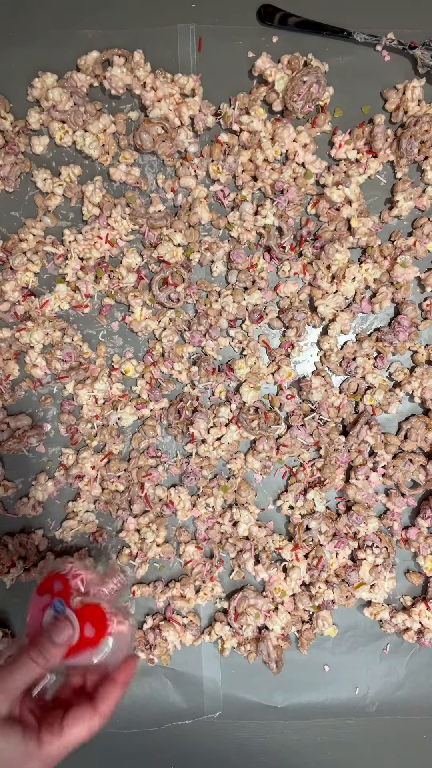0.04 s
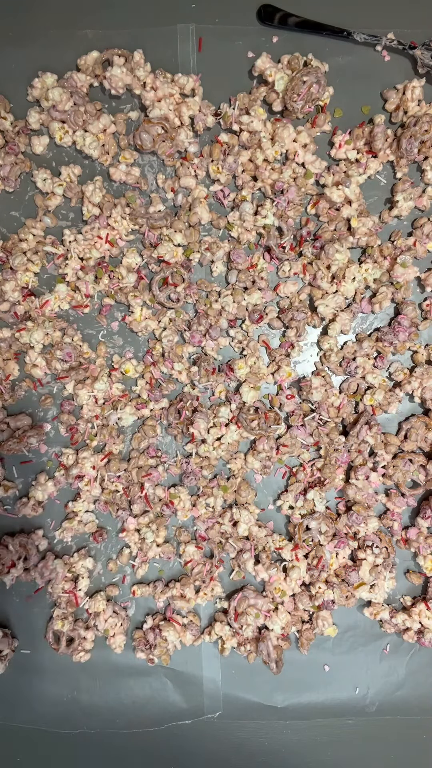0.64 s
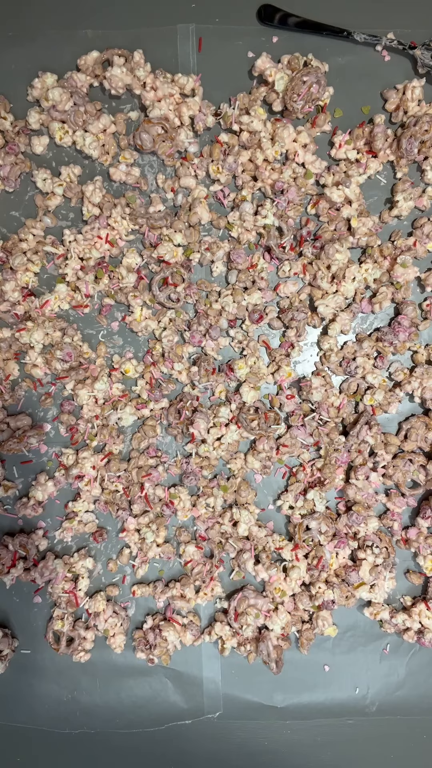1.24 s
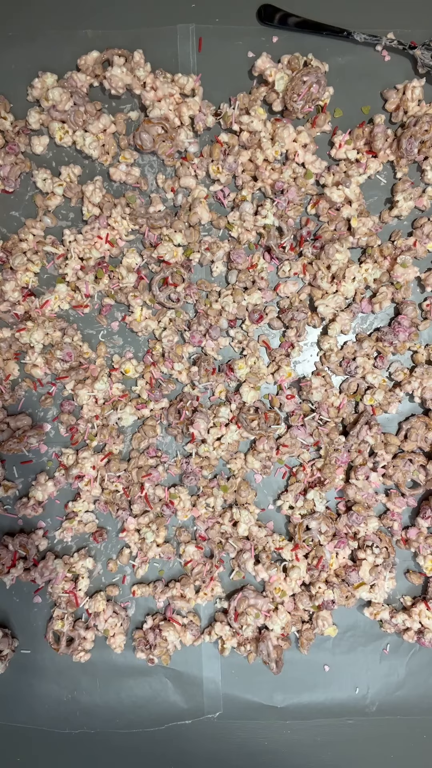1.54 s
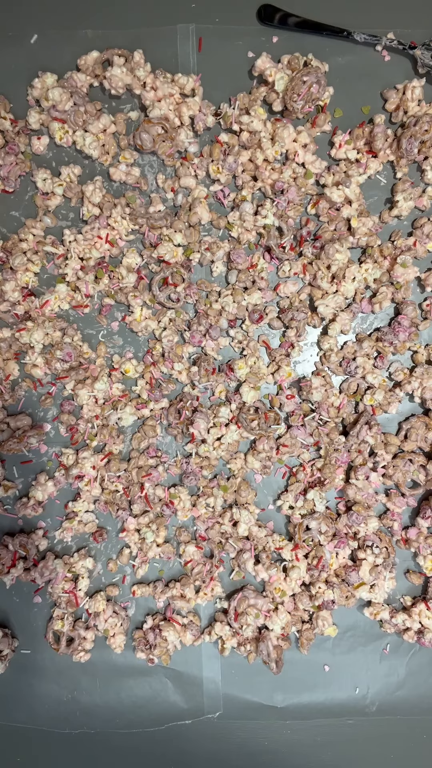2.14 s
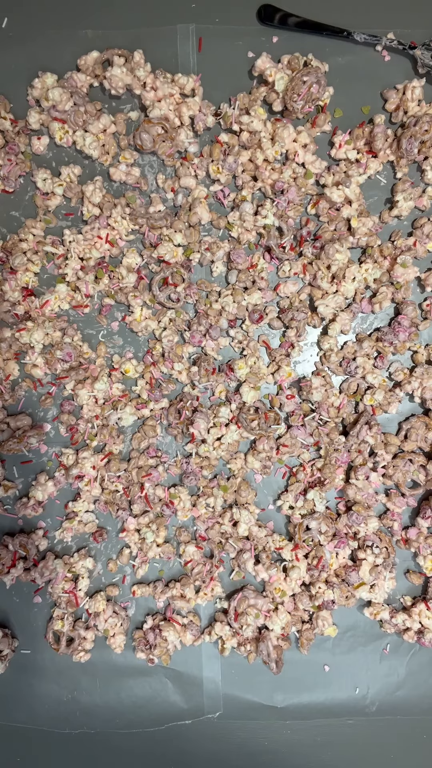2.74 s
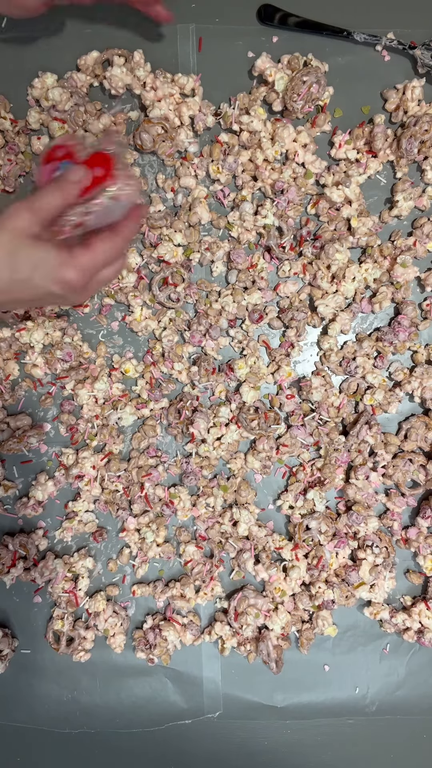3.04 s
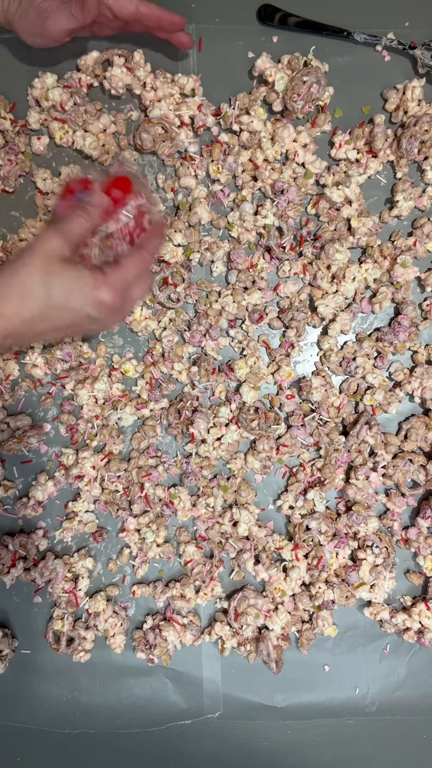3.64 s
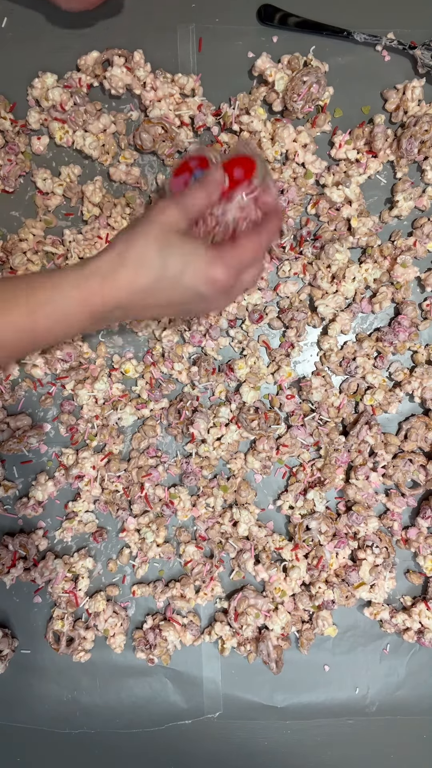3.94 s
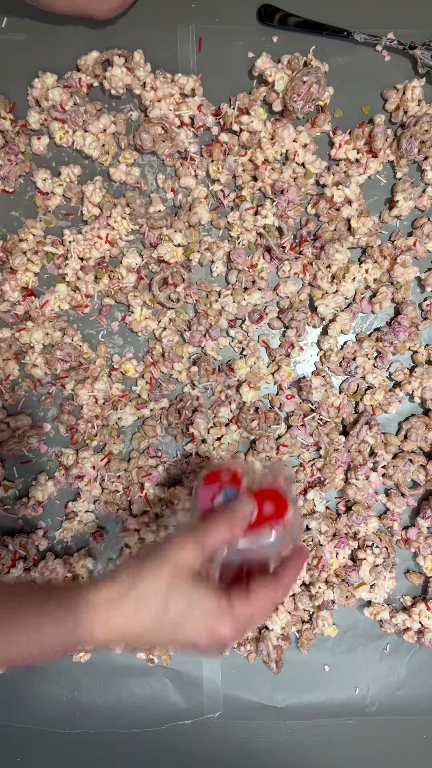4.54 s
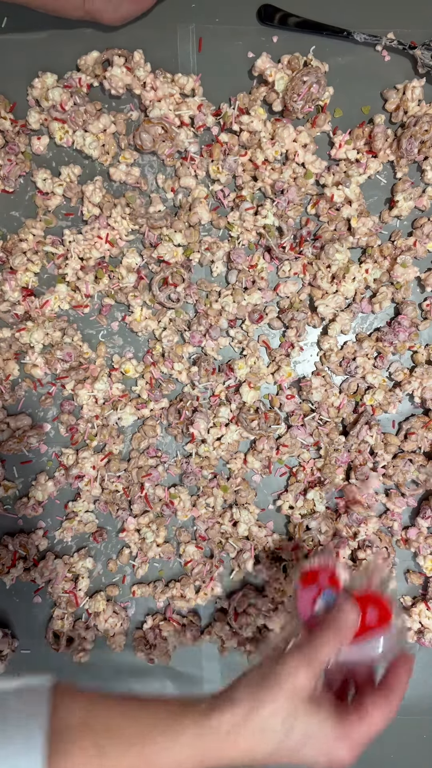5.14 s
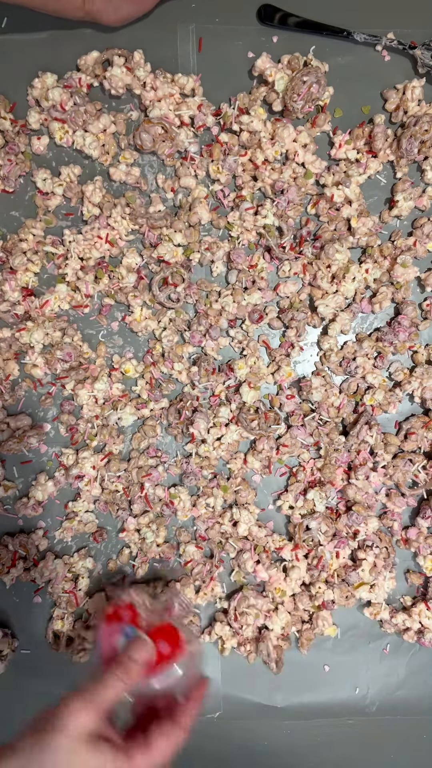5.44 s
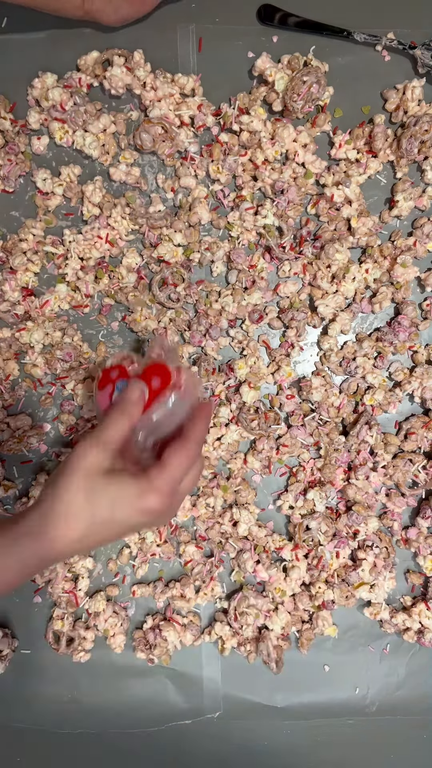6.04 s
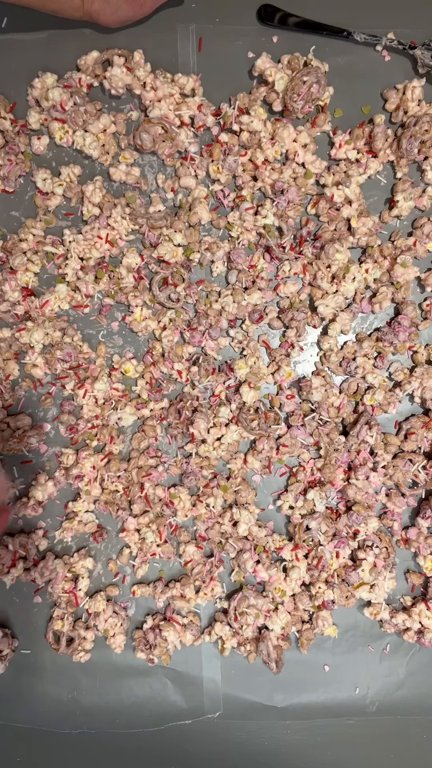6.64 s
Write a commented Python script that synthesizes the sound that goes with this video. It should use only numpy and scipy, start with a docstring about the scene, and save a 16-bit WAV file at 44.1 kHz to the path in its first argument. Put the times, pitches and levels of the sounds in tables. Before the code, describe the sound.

A small plastic tub of sprinkles is shaken fast and evenly, making a crisp, grainy rattle with a slightly hollow ring.

```python
"""A small plastic shaker of sugar sprinkles, shaken about six times a second over a kitchen tray.
On each stroke the grains slide, pile against the end and ring the hollow tub; on the way back they
rattle more softly. Single grains tick, clumps knock and the hand bumps the tub now and then.
Behind it: room air, a faint hum and a low distant drone that fades."""
import sys
import numpy as np
from scipy import signal
from scipy.fft import rfft, irfft, next_fast_len
from scipy.io import wavfile
from scipy.ndimage import map_coordinates

SR = 44100
rng = np.random.default_rng(int(sys.argv[2]) if len(sys.argv) > 2 else 0)


def transcribe(signal):
    """Save signal, clipped to [-1, 1], as a 16-bit WAV file at the path in sys.argv[1]."""
    frames = np.atleast_2d(signal).T
    limited = np.clip(frames, -1, 1)
    pcm = np.round(limited * 32767).astype(np.int16)
    wavfile.write(sys.argv[1], SR, pcm)


N = 303363

# hand strokes: t/s, rattle/dB, length/s, draw-back lead/s, draw-back/dB, cavity/dB, cavity/Hz, plate/Hz
STROKES = [(0.002, -26, 0.016, 0.052, -28, -43, 2050, 4200),
           (0.117, -30.5, 0.08, 0.05, -36, -45.0, 2020, 4040),
           (0.278, -29.5, 0.049, 0.048, -40, -48, 2000, 4120),
           (0.432, -31, 0.071, 0.048, -39.5, -44, 2030, 3870),
           (0.609, -32, 0.058, 0.051, -34, -42.5, 1890, 3770),
           (0.783, -31.5, 0.05, 0.056, -35, -45, 2010, 3930),
           (0.947, -30.5, 0.05, 0.059, -38, -42, 2100, 3920),
           (1.108, -32.0, 0.067, 0.066, -36.5, -42.5, 2050, 3800),
           (1.277, -32.5, 0.065, 0.058, -33.0, -44.5, 1980, 3860),
           (1.438, -34.5, 0.048, 0.062, -41, -44.5, 2010, 3890),
           (1.583, -32.5, 0.035, 0.055, -42.5, -43.5, 2010, 3800),
           (1.743, -35.5, 0.048, 0.046, -37.5, -49, 2060, 3820),
           (1.903, -34.5, 0.044, 0.06, -35.5, -48, 1980, 3820),
           (2.056, -34, 0.038, 0.048, -37, -48.5, 2010, 3800),
           (2.197, -34, 0.041, 0.05, -42.5, -48, 2050, 3800),
           (2.352, -31.5, 0.038, 0.065, -40.5, -42.5, 2020, 4050),
           (2.511, -33, 0.052, 0.057, -38.5, -42.5, 2020, 3800),
           (2.653, -34.5, 0.083, 0.028, -37.5, -42.5, 1990, 3700),
           (2.828, -34.5, 0.043, 0.047, -42, -45.5, 2070, 3670),
           (2.986, -32.5, 0.042, 0.059, -39.5, -45, 2070, 3940),
           (3.143, -36, 0.051, 0.057, -33, -48, 2010, 4040),
           (3.295, -35, 0.045, 0.052, -37, -48.5, 1950, 4200),
           (3.454, -34.5, 0.066, 0.066, -36.5, -44, 2025, 3900),
           (3.624, -31.5, 0.07, 0.053, -38.5, -45.0, 1960, 3840),
           (3.799, -30.5, 0.048, 0.052, -31.5, -46, 2120, 3890),
           (3.961, -33.5, 0.09, 0.057, -36.5, -43.5, 2030, 3880),
           (4.125, -31.5, 0.032, 0.048, -38, -40.5, 2055, 4000),
           (4.287, -32, 0.049, 0.057, -35, -42.5, 1940, 4080),
           (4.451, -33.5, 0.056, 0.062, -38.5, -40.5, 2060, 4000),
           (4.611, -27.5, 0.034, 0.064, -37.5, -39.5, 2020, 4070),
           (4.772, -30, 0.039, 0.043, -35.5, -41.5, 2040, 3880),
           (4.925, -31.5, 0.031, 0.043, -38.0, -42.5, 2000, 4100),
           (5.082, -37.5, 0.023, 0.04, -44, -48.5, 2000, 4070),
           (5.232, -34, 0.031, 0.059, -42.5, -45, 2100, 4030),
           (5.37, -33.5, 0.041, 0.051, -41, -46, 2010, 3820),
           (5.52, -31.0, 0.051, 0.04, -41.5, -44, 2040, 3890),
           (5.686, -28.5, 0.029, 0.066, -39.5, -39.5, 1955, 4080),
           (5.847, -33, 0.039, 0.057, -37.5, -46, 2030, 3880),
           (5.99, -33.5, 0.045, 0.058, -43.5, -49.5, 2190, 3970),
           (6.145, -35, 0.043, 0.046, -38.5, -44.5, 2070, 4000),
           (6.309, -32.0, 0.046, 0.06, -38, -42.5, 2040, 3790),
           (6.463, -29.5, 0.031, 0.051, -38.5, -44.5, 2050, 3920),
           (6.629, -36.5, 0.06, 0.078, -39.5, -45, 2010, 3960),
           (6.766, -38.5, 0.033, 0.028, -38, -52.5, 2080, 3920)]
# loose grains rolling: t/s, level/dB
ROLLING = [(0, -49.5), (1.6, -47), (3.3, -48.5), (4.6, -47), (5.1, -47), (6.5, -45), (6.79, -49),
           (6.82, -56), (6.88, -57)]
# end plate ring and landing thud as the tub empties: t/s, plate gain/dB, thud gain/dB
FILL = [(0, -12, -10), (0.7, -8, -12.5), (1.3, -23, -11), (1.9, -5.5, -10), (2.5, -15, -12),
        (3.3, -9, -7.5), (4.5, -9.5, -12.5), (5.6, -5, -15), (6.3, -6.5, -10.5), (6.7, -4, -12.5)]


def amp(db):
    """Decibels to gain."""
    return 10 ** (np.asarray(db) / 20)


def unit(x):
    """Scale to rms 1."""
    return x / np.sqrt(np.mean(x ** 2) + 1e-20)


def along(points, hz):
    """Interpolate (f/Hz, value) points on a log axis."""
    f, value = np.transpose(points)
    return np.interp(np.log(hz + 1), np.log(f + 1), value)


def clock():
    """Sample times in s."""
    return np.arange(N) / SR


def curves(rows):
    """One per-sample curve for each column after t/s."""
    t, *columns = np.transpose(rows)
    return [np.interp(clock(), t, column) for column in columns]


def wobble(rate_hz):
    """Smooth random curve, rate_hz knots a second."""
    t = clock()[::32]
    return np.interp(clock(), t, map_coordinates(rng.standard_normal(4096), [t * rate_hz], mode="wrap"))


def filtered(x, response):
    """Apply a complex frequency response."""
    size = 2 * next_fast_len((N + SR // 2) // 2)
    return irfft(rfft(x, size) * response(np.fft.rfftfreq(size, 1 / SR)), size)[..., :N]


def highpass(x, edge_hz, order=3):
    """Low cut: a small body radiates little bass."""
    return signal.sosfilt(signal.butter(order, edge_hz, "highpass", fs=SR, output="sos"), x)


def causal(gain):
    """Minimum-phase response with this gain: rings only after a hit."""
    cepstrum = irfft(np.log(np.maximum(gain, 1e-6)))
    half = len(cepstrum) // 2
    cepstrum[1:half] *= 2
    cepstrum[half + 1:] = 0
    return np.exp(rfft(cepstrum))


def resonance(hz, centre_hz, width_hz):
    """Response of one damped mode."""
    return 1j * hz * width_hz / (centre_hz ** 2 - hz ** 2 + 1j * hz * width_hz)


def modes(hz, rows):
    """Summed response of (f/Hz, width/Hz, level/dB) modes."""
    return sum(amp(db) * resonance(hz, centre_hz, width_hz) for centre_hz, width_hz, db in rows)


def noise(spectrum):
    """Coloured noise of rms 1."""
    return unit(filtered(rng.standard_normal(N), lambda hz: amp(along(spectrum, hz))))


def surges(rows, sharpness=1.56):
    """Summed power of grain surges (t/s, level/dB, rise/s, fall/s)."""
    t = clock()[::32]
    power = 0
    for peak_s, db, rise_s, fall_s in rows:
        distance = np.abs((t - peak_s) / np.where(t < peak_s, rise_s, fall_s))
        power += amp(db) ** 2 * np.exp(-distance ** sharpness)
    return np.interp(clock(), t, power) + 1e-12


def forward_power(db, lag_s=0, stretch=1, rise_share=.42):
    """One surge per forward stroke; the grains gather speed over rise_share of it."""
    t, _, length_s, *_ = np.transpose(STROKES)
    span_s = stretch * length_s
    return surges(zip(t + lag_s, db, span_s * rise_share, span_s * (1 - rise_share)))


def back_power(rise_s=.016, fall_s=.022):
    """The draw-back before each stroke throws the grains against the lid."""
    return surges((t - lead_s, db, rise_s, fall_s) for t, _, _, lead_s, db, *_ in STROKES)


def impacts(power, rate_hz, scatter_db):
    """Random collisions carrying this power: a stronger surge brings more and harder ones."""
    chance = np.clip(rate_hz / SR * unit(np.sqrt(power)), 1e-6, 1)
    luck, hardness, polarity = rng.random((3, N))
    hit = luck < chance
    size = amp(scatter_db * np.sqrt(12) * hardness[hit]) * np.sign(polarity[hit] - .5)
    out = np.zeros(N)
    out[hit] = unit(size) * np.sqrt(power[hit] / chance[hit])
    return out


def ringing(power, body, rate_hz, scatter_db, pitch_hz, hop_s=.025, detune=.007, load_db=2):
    """Grains strike a body; every hop_s the sliding load shifts its modes in pitch and level."""
    blows = impacts(power, rate_hz, scatter_db)
    out = np.zeros(N + SR)
    hop, size = round(hop_s * SR), 4096
    hz = np.fft.rfftfreq(size, 1 / SR)
    stroke_s = [row[0] for row in STROKES]
    pitch_ratios = np.clip(pitch_hz / np.median(pitch_hz), .94, 1.07)
    for start in range(0, N, hop):
        ratio = np.interp(start / SR, stroke_s, pitch_ratios)
        loaded = [(centre_hz * ratio * (1 + detune * rng.normal()), width_hz, db + load_db * rng.normal())
                  for centre_hz, width_hz, db in body]
        out[start:start + size] += irfft(rfft(blows[start:start + hop], size) * modes(hz, loaded))
    return np.sqrt(power.mean()) * unit(out[:N])


def hits(rows, spread_hz, t60_s):
    """Short blows (t/s, peak/dB, f/Hz), each ringing a fresh cluster of damped modes."""
    out, t = np.zeros(N + SR), np.arange(SR // 12) / SR
    for start_s, db, pitch_hz in rows:
        mode_hz = pitch_hz + spread_hz * rng.uniform(-1, 1, (24, 1))
        strength = rng.standard_normal((24, 1))
        ring = np.sum(strength * np.sin(2 * np.pi * mode_hz * t), axis=0)
        blow = ring * amp(-60 * t / t60_s)
        out[round(start_s * SR):][:len(t)] += amp(db) * blow / np.abs(blow).max()
    return out[:N]


def grain_clicks(power):
    """Grains click on each other and on the plastic, each at a pitch set by its size."""
    # click spectrum: f/Hz, level/dB
    spectrum = [(300, -58), (1200, -14.5), (1500, -12), (2050, -6), (2440, -11.5), (2700, -10),
                (3200, -8.5), (3800, -2.5), (4300, -3.5), (4850, -3), (5500, 0), (6200, 0.5), (7500, 0.5),
                (9500, -0.5), (11200, 0.5), (13000, -1), (15700, -17)]
    pitches_hz = np.geomspace(3600, 13000, num=9)
    click = lambda hz, pitch_hz: resonance(hz, pitch_hz, .15 * pitch_hz)
    grains = np.zeros(N)
    for pitch_hz in pitches_hz:
        size_share = unit(amp(1.7 * wobble(20))) ** 2
        sliding = impacts(power * size_share, rate_hz=480, scatter_db=1.2)
        flying = .25 * impacts(power, rate_hz=40, scatter_db=1.8)
        grains += filtered(sliding + flying, lambda hz: click(hz, pitch_hz))
    bank_gain = lambda hz: np.sqrt(sum(np.abs(click(hz, p)) ** 2 for p in pitches_hz) + 1e-4)
    clicks = filtered(grains, lambda hz: causal(amp(along(spectrum, hz)) / bank_gain(hz)))
    return np.sqrt(power.mean()) * unit(clicks)


def rattle():
    """Grains surge in clumps, click, and ring the end plate and the stiff side wall."""
    # end plate and side wall modes: f/Hz, width/Hz, level/dB
    plate_modes = [(3786, 70, 2), (3905, 105, 15), (4200, 110, 7)]
    wall_modes = [(4510, 150, -0.5), (5520, 310, 1.5), (6050, 710, 4.5)]
    # wall ring relative to the rattle: t/s, gain/dB
    wall_gains = [(0, -9.5), (2.4, -18.5), (3.0, -5), (3.3, -4), (3.9, -6), (4.3, -2.5), (4.8, -6.5),
                  (5.5, -6.5), (6.1, -6.5), (6.8, -13)]
    _, stroke_db, *_, cavity_hz, plate_hz = np.transpose(STROKES)
    (rolling_db,), (plate_db, _), (wall_db,) = curves(ROLLING), curves(FILL), curves(wall_gains)
    forward, back = forward_power(stroke_db), back_power()
    clumps = unit(amp(1.7 * wobble(130) + 1.2 * wobble(420))) ** 2
    clicks = grain_clicks((forward + back + amp(rolling_db) ** 2) * clumps)
    plate_power = (forward + .25 * back) * amp(plate_db) ** 2
    plate = ringing(plate_power, plate_modes, rate_hz=420, scatter_db=5, pitch_hz=plate_hz)
    wall_power = forward * clumps * amp(wall_db) ** 2
    wall = ringing(wall_power, wall_modes, rate_hz=540, scatter_db=6.5, pitch_hz=cavity_hz)
    return amp(-.68) * clicks + amp(-2) * plate + amp(.7) * wall


def tub(thud_lag_s=.015, thud_rise_s=.035, thud_fall_s=.047):
    """The mass of grains lands just after the first clicks, rings the cavity and thuds on the end."""
    # hollow tub modes: f/Hz, width/Hz, level/dB
    cavity_modes = [(1480, 100, 0), (1646, 150, 1.5), (1870, 80, -6), (2020, 85, 12), (2253, 140, 4.5),
                    (2604, 110, 4.5), (3100, 940, -2)]
    # landing thud: f/Hz, level/dB
    thud_spectrum = [(60, -40), (200, -8), (300, 1.5), (420, -7), (560, -4), (900, -5.5), (1300, -17.5),
                     (2500, -21.5)]
    stroke_s, *_, cavity_db, cavity_hz, _ = np.transpose(STROKES)
    (rolling_db,), (_, thud_db) = curves(ROLLING), curves(FILL)
    forward = forward_power(cavity_db, lag_s=.012, stretch=.96)
    power = forward + amp(-14) ** 2 * back_power() + amp(rolling_db - 11.5) ** 2
    flares = unit(amp(2.6 * wobble(45))) ** 2  # larger clumps
    ring = ringing(power * flares, cavity_modes, rate_hz=310, scatter_db=1.3, pitch_hz=cavity_hz)
    ring = unit(highpass(ring, edge_hz=1250, order=8))
    landing = surges((t + thud_lag_s, db, thud_rise_s, thud_fall_s) for t, db in zip(stroke_s, cavity_db))
    blows = impacts(landing, rate_hz=1200, scatter_db=11)
    thud = unit(filtered(blows, lambda hz: causal(amp(along(thud_spectrum, hz)))))
    return np.sqrt(power.mean()) * (amp(.5) * ring + amp(thud_db) * thud)


def drone(tone_hz=127.5):
    """A distant rumble with a wavering low tone; both fade."""
    # rumble spectrum: f/Hz, level/dB
    spectrum = [(20, -31), (42, -15), (70, -10.5), (105, -5.5), (140, -12.5), (175, -16), (400, -28.5),
                (1500, -57)]
    # rumble and tone: t/s, level/dB
    rumble_levels = [(0, -58), (.7, -61.5), (2.3, -62.5), (2.75, -65), (3.1, -58), (3.5, -70)]
    tone_levels = [(0, -74), (.95, -61), (2.35, -61), (2.65, -71), (2.78, -55), (2.95, -69), (3.1, -67),
                   (3.5, -78.5)]
    (rumble_db,), (tone_db,) = curves(rumble_levels), curves(tone_levels)
    tone_rms = amp(tone_db + 1.7 * wobble(35))
    phase = 2 * np.pi * np.cumsum(tone_hz + 2.96 * wobble(7.7)) / SR
    return amp(rumble_db) * noise(spectrum) + np.sqrt(2) * tone_rms * np.sin(phase)


def room_air():
    """Stereo air noise with faint narrow tones and a blurred hum."""
    # air spectrum: f/Hz, level/dB
    spectrum = [(20, -32), (45, -20), (110, -13.5), (210, -17), (290, -1), (400, -5), (550, -15.5),
                (1000, -11.5), (2000, -16), (5000, -7), (15000, -43)]
    # tones in the air: f/Hz, width/Hz, level/dB
    tone_modes = [(272.6, 19, 7), (313, 15, -11), (472.4, 12, 9.5), (674, 21, 6.5)]
    # hum: t/s, level/dB
    hum_levels = [(0, -91), (2.6, -73), (3.3, -102), (4.1, -81), (4.6, -69.5), (6.2, -67.5), (6.88, -81)]
    hum_db, = curves(hum_levels)
    hum = unit(filtered(rng.standard_normal(N), lambda hz: resonance(hz, 187, width_hz=26) ** 2))
    tones = unit(filtered(rng.standard_normal(N), lambda hz: modes(hz, tone_modes)))
    centre = amp(-55 + 1.4 * wobble(5.4)) * noise(spectrum)
    diffuse = np.array([noise(spectrum), noise(spectrum)])
    return centre + amp(hum_db) * hum + amp(-68) * tones + amp(-58.5) * diffuse


def hand_bumps(t60_s=.022, attack_s=.00058):
    """The hand bumps the tub: a soft, broad thump with no clear pitch."""
    # bumps: t/s, peak/dB
    bumps = [(0.007, -27), (0.167, -31), (0.311, -35), (0.320, -31), (0.492, -33.5), (0.980, -38),
             (1.144, -36), (1.338, -34), (3.496, -35), (3.515, -36), (4.351, -33)]
    # bump spectrum: f/Hz, level/dB
    spectrum = [(100, -22), (330, -5), (450, 1), (600, -2), (1000, 0), (1500, -8), (3000, -22), (8000, -50)]
    out, t = np.zeros(N + SR), np.arange(SR // 12) / SR
    envelope = (1 - np.exp(-t / attack_s)) * amp(-60 * t / t60_s)
    dull = noise(spectrum)
    for start_s, db in bumps:
        start = round(start_s * SR)
        thump = envelope * dull[start:start + len(t)]
        out[start:start + len(t)] += amp(db) * thump / np.abs(thump).max()
    return out[:N]


def grain_ticks():
    """Single grains hit hard and jostle their neighbours."""
    # hard hits: t/s, level/dB, f/Hz, neighbours' level/dB
    hard_hits = [(0.0749, -15, 9700, -29), (0.236, -19, 9800, -29), (0.3, -21, 5800, -25),
                 (0.404, -17, 6600, -22), (0.536, -22, 11000, -33), (0.8285, -26, 7500, -37),
                 (0.8764, -24, 11000, -27), (0.8959, -21, 10400, -34), (0.9373, -20, 6500, -28),
                 (1.0064, -24, 9800, -37), (1.1951, -19, 11000, -26), (1.2015, -22, 11000, -30),
                 (1.3715, -19, 9500, -29), (1.4324, -21, 8300, -29), (1.8246, -25, 10000, -28),
                 (1.8905, -22, 6500, -31), (1.9038, -14, 6700, -22), (2.019, -25, 7000, -37),
                 (2.2856, -22, 7300, -37), (2.3428, -15, 7900, -27), (2.445, -22, 7900, -36),
                 (2.5964, -23, 9200, -34), (2.6703, -23, 6600, -27), (2.8543, -25, 6400, -36),
                 (3.0129, -22, 7200, -32), (3.0619, -25, 7800, -29), (3.0951, -19, 7000, -27),
                 (3.1075, -18, 5400, -32), (3.1409, -23, 4800, -33), (3.3158, -22, 5700, -34),
                 (3.395, -22, 9200, -33), (3.4474, -23, 8400, -31), (3.4957, -19, 8300, -33),
                 (3.556, -22, 11000, -30), (3.5946, -23, 5800, -33), (3.6197, -19, 6500, -28),
                 (3.7581, -14, 6400, -19), (3.7663, -16, 5600, -26), (3.785, -22, 7000, -30),
                 (3.9034, -24, 4900, -30), (3.9167, -16, 7600, -29), (3.9277, -17, 6900, -29),
                 (3.941, -18, 5000, -29), (3.9576, -17, 5800, -26), (4.0152, -20, 4500, -32),
                 (4.0334, -22, 7400, -35), (4.1216, -17, 6600, -27), (4.2165, -17, 10400, -30),
                 (4.2822, -18, 5600, -28), (4.288, -19, 5600, -27), (4.311, -19, 5400, -26),
                 (4.3161, -20, 5400, -32), (4.8634, -23, 8600, -29), (4.915, -19, 6500, -31),
                 (4.9335, -19, 6000, -28), (5.0832, -24, 6500, -35), (5.0988, -24, 6200, -38),
                 (5.2181, -21, 7800, -27), (5.3621, -19, 5900, -23), (5.4582, -23, 11000, -32),
                 (5.5665, -23, 5900, -35), (5.5887, -24, 5700, -35), (5.6331, -22, 9300, -35),
                 (5.6655, -22, 11000, -27), (5.6718, -19, 5420, -22), (5.7915, -17, 11000, -23),
                 (6.0823, -21, 8500, -26), (6.2457, -25, 11000, -36), (6.2792, -18, 9800, -34),
                 (6.4528, -20, 4800, -22), (6.4687, -19, 6000, -28), (6.497, -24, 4000, -29),
                 (6.6146, -24, 4500, -33), (6.6325, -21, 8100, -29), (6.742, -26, 7600, -36)]
    ticks = hits([(t, db, hz) for t, db, hz, _ in hard_hits], spread_hz=3800, t60_s=.006)
    skitter = hits([(t, db, hz) for t, _, hz, db in hard_hits], spread_hz=3000, t60_s=.035)
    return highpass(ticks, edge_hz=3800) + amp(-1.5) * highpass(skitter, edge_hz=3400)


def clump_knocks():
    """The tub knocks as a clump lands."""
    # knocks: t/s, level/dB, f/Hz
    knocks = [(0.282, -32, 1600), (0.300, -32, 2090), (0.445, -33.5, 1550), (0.586, -26, 1655),
              (1.225, -32, 2030), (1.293, -29, 2000), (1.337, -31.5, 2100), (1.469, -31.5, 2090),
              (2.640, -30, 1740), (3.300, -28.5, 2145), (3.454, -31, 1995), (3.764, -31.5, 1690),
              (4.130, -27, 2000), (4.294, -29, 2030), (5.097, -32.5, 1900), (6.083, -36, 1980)]
    return highpass(hits(knocks, spread_hz=253, t60_s=.038), edge_hz=1250)


def kitchen(x, positions=20):
    """Short diffuse tail, different on each side, that changes as the shaker moves about."""
    # room decay: f/Hz, t60/s
    decay = [(200, 0.021), (2500, 0.24), (12000, 0.11)]
    out = np.zeros((2, N + SR))
    hop, predelay = N // positions + 1, SR // 300
    for start in range(0, N, hop):
        hz, t, bins = signal.stft(rng.standard_normal((2, SR // 3)), SR, nperseg=256)
        _, tail = signal.istft(bins * amp(-60 * t / along(decay, hz)[:, None]), SR, nperseg=256)
        wet = signal.fftconvolve(x[None, start:start + hop], tail / np.linalg.norm(tail[0]), axes=1)
        out[:, start + predelay:][:, :wet.shape[1]] += wet
    return out[:, :N]


def scene():
    """The shaker close by, its kitchen reverb and the background."""
    bright = grain_ticks() + rattle()
    hollow = tub() + amp(-1) * clump_knocks() + hand_bumps()
    reverb = kitchen(amp(-7.5) * bright + amp(-1.5) * hollow)
    return bright + hollow + reverb + drone() + room_air()


def record(dry, top_hz=15750):
    """The microphone widens some bands more than others; its two channels differ in phase in the treble."""
    # stereo width: f/Hz, side gain/dB
    side_gains = [(120, 3), (300, -8), (550, -3.5), (800, -1.5), (1200, 0.5), (1650, -7), (2000, -5),
                  (2300, -12), (2440, 9), (2550, 2), (2800, -3.5), (3200, 5.5), (3800, -32), (4600, 4.5),
                  (5800, -9), (7500, 4.5), (11000, -0.5), (12500, -74)]
    # left channel's phase lead: f/Hz, phase/rad
    channel_lead = [(0, 0), (3500, .03), (5800, .28), (8000, 1.1), (10000, 1.85), (11600, 2.45), (12500, 3.05)]
    mid = (dry[0] + dry[1]) / 2
    side = filtered((dry[0] - dry[1]) / 2, lambda hz: amp(along(side_gains, hz)))
    turn_rad = lambda hz: np.interp(hz, *np.transpose(channel_lead)) / 2
    phases = lambda hz: np.exp(1j * np.array([turn_rad(hz), -turn_rad(hz)]))
    return filtered(np.array([mid + side, mid - side]), lambda hz: phases(hz) * (hz < top_hz))


dry = scene()
out = record(dry)
transcribe(out)
```